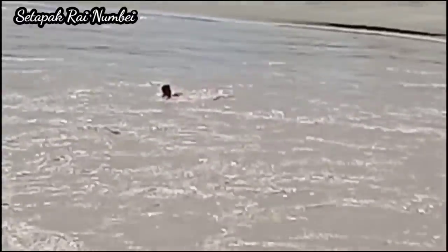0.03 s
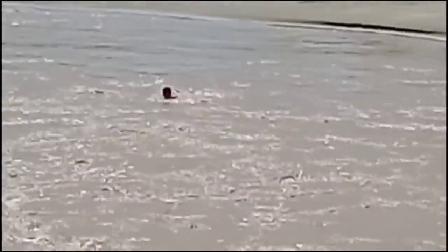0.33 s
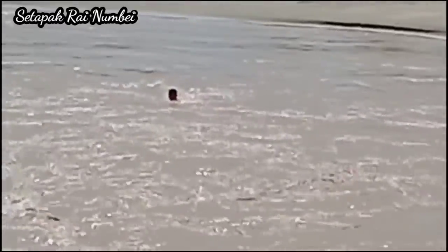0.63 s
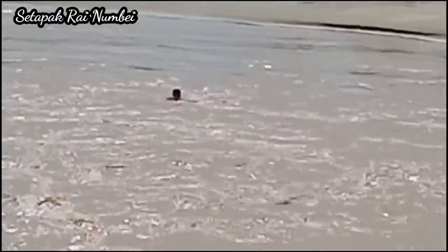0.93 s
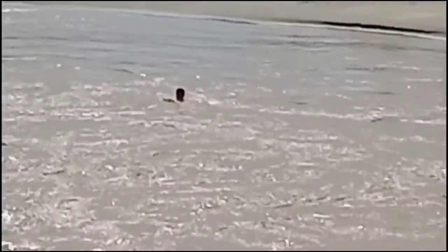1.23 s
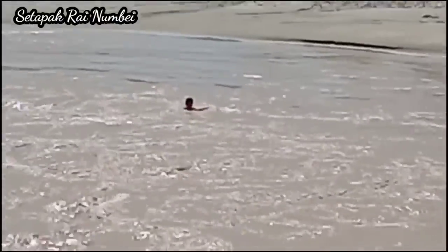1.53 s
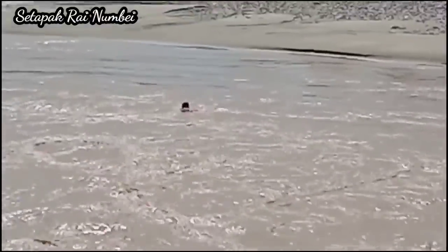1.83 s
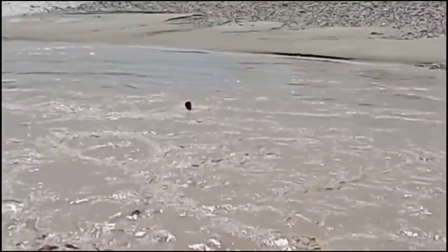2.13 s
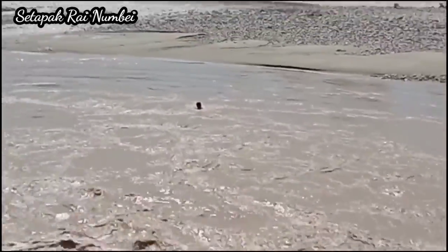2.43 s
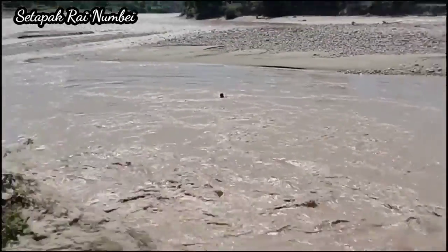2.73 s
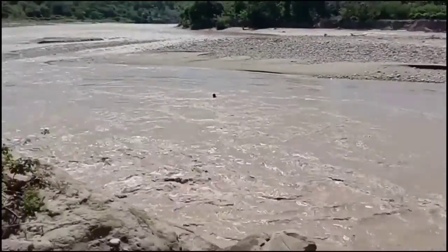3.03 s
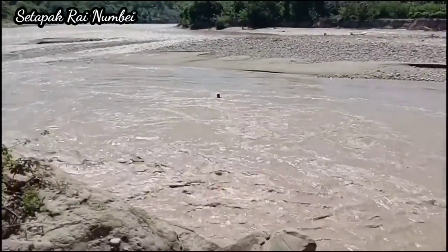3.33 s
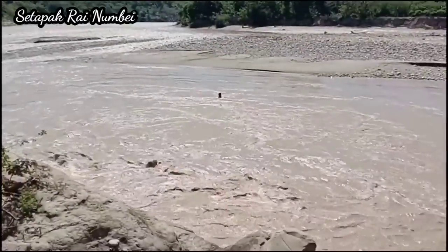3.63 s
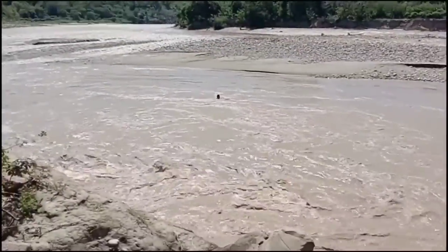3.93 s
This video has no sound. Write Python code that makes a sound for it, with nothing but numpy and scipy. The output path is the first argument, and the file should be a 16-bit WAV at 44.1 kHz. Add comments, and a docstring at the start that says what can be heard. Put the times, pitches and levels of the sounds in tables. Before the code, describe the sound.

Rushing river water bubbles and gurgles while low wind rumbles against the microphone.

```python
"""Stony bank of a flooded river. The current rushes past as a wide wash, full of small
ringing bubbles and ticking spray; swallowed air pockets gulp and wave crests splash.
Toward the end the microphone turns to a nearer, brighter riffle.
Wind gusts rumble on the microphone, and single eddies buffet it."""
import sys
import numpy as np
from scipy import signal
from scipy.fft import rfft, irfft
from scipy.io import wavfile
from scipy.ndimage import uniform_filter1d

SR = 44100
rng = np.random.default_rng(int(sys.argv[2]) if len(sys.argv) > 2 else 0)


def pcm_store(signal):
    """Save signal as 16-bit PCM."""
    levels = np.round(np.clip(np.atleast_2d(signal), -1, 1) * 32767)
    wavfile.write(sys.argv[1], SR, levels.astype(np.int16).T)


N = 176400

# river and splash colour (frequency [Hz], relative level [dB])
WATER_SPECTRUM = [(60, -26), (250, -23), (340, -15), (425, -12), (470, -2), (560, -0.5), (650, -1),
                  (790, -4.5), (1170, 0.5), (1450, -2), (1880, -7), (2080, -14), (2450, -16.5),
                  (3150, -11.5), (4300, -6.5), (4750, -10.5), (5280, -23), (6400, -18), (7750, -15),
                  (8250, -20.5), (9300, -41), (9900, -33), (10900, -31.5), (11500, -35.5), (13200, -27.5),
                  (15400, -25)]
# river swell, each band used about its mean (time [s], body [dB], hiss [dB], fizz [dB])
RIVER_SWELL = [(0, -34, -35, -48), (.35, -34.5, -35, -51.5), (.9, -34.5, -36, -51), (1.3, -35, -36.5, -52),
               (2.05, -34.5, -36, -52), (2.35, -36, -37.5, -54.5), (2.6, -37, -37.5, -54.5),
               (3.15, -35, -36, -56.5), (3.4, -34.5, -35, -54.5), (3.72, -36, -35.5, -56.5),
               (3.88, -33.5, -36, -52), (4, -37.5, -39, -60)]
# crossfades (body-hiss start [Hz], end [Hz], hiss-fizz start [Hz], end [Hz])
CROSSFADES_HZ = [1800, 2830, 10100, 12000]
# microphone turn toward the riffle (time [s], share [0-1])
MIC_TURN = [(0, 0), (2.1, 0.18), (2.9, 0.35), (4, 1)]
# riffle colour (frequency [Hz], relative level [dB])
RIFFLE_SPECTRUM = [(200, -37), (400, -2), (700, -8), (1200, -5), (1900, -8), (2400, 4.5), (3600, 9),
                   (4500, -15), (5050, -6), (5800, 4), (7500, -3), (9200, -12), (10000, -11), (10900, -13),
                   (11600, -30), (15000, -30)]
# riffle nearness (time [s], level [dB])
RIFFLE_ENVELOPE = [(0, -74), (2.6, -55), (3.15, -50), (3.5, -43), (4, -42)]
# collapsing crests (time [s], level [dB])
SPLASH_EVENTS = [(0.512, -33), (1.971, -36), (3.454, -41), (3.526, -31.5), (3.611, -32.5), (3.85, -45)]
# swallowed air pockets (time [s], level [dB], start pitch [Hz])
GULP_EVENTS = [(.875, -27, 1140), (1.135, -34, 627), (1.99, -34, 565), (3.862, -28.5, 581),
               (3.89, -34, 445), (3.945, -30, 1055)]
# wind strength (time [s], level before trim [dB])
GUST_ENVELOPE = [(0, -26.5), (.17, -23), (.26, -40), (.3, -31.5), (.39, -59), (.45, -32), (.51, -37),
                 (.57, -25), (.7, -27.5), (.82, -35.5), (.97, -32), (1.03, -51), (1.14, -47), (1.24, -27.5),
                 (1.36, -35.5), (1.49, -27), (1.54, -35.5), (1.61, -24.5), (1.85, -31.5), (1.99, -29),
                 (2.06, -48), (2.15, -37), (2.23, -62), (2.28, -33), (2.33, -49), (2.38, -27), (2.49, -36),
                 (2.58, -45), (2.72, -29), (2.93, -27), (3.17, -26), (3.36, -28), (3.43, -29.5),
                 (3.58, -29.5), (3.65, -35.5), (3.73, -28.5), (3.92, -35.5), (4, -45)]
# rumble of a light and a strong gust (frequency [Hz], relative level [dB])
LIGHT_GUST_SPECTRUM = [(20, -27), (42, -24), (68, -1.5), (105, -0.5), (150, -4), (200, -12.5), (280, -20),
                       (420, -26), (900, -64), (3000, -90)]
STRONG_GUST_SPECTRUM = [(20, -30), (42, -21), (68, -2), (115, 1.5), (160, 1), (210, -1), (300, -10),
                        (420, -18), (900, -54), (3000, -85)]
# eddies hitting the microphone (time [s], level before trim [dB], pitch [Hz])
BUFFET_EVENTS = [(0.612, -16.5, 130), (0.657, -15, 168.3), (0.722, -21.5, 187.6), (1.583, -17, 166.2),
                 (1.959, -12.5, 150), (2.377, -20.5, 180), (2.481, -15.5, 139.8), (2.828, -14.5, 148.7),
                 (2.908, -12, 209), (2.972, -11, 150.2), (3.06, -12.5, 114.1), (3.121, -16.5, 229.4),
                 (3.152, -11, 150.2), (3.276, -19, 99.7), (3.364, -11.5, 120.6), (3.596, -19.5, 110.4),
                 (3.724, -17.5, 115)]


def river(wash_db=-32, bubbles_db=-39.5, spray_db=-46.5, band_trims_db=(-0.5, -0.5, 1)):
    """Rushing current: wash, bubbles and spray, swelling slowly in three bands."""
    water = amp(wash_db) * water_colour(churn(flicker_db=1.25))
    water += amp(bubbles_db) * water_colour(bubbles())
    water += amp(spray_db) * water_colour(spray(spread_db=3, decay_s=0.00043, highpass_hz=3470))
    hz, bins, out = np.fft.rfftfreq(N, 1 / SR), rfft(water), np.zeros(N)
    band_gains = [(1, 0, 0, 0), (0, 1, 1, 0), (0, 0, 0, 1)]  # body, hiss, fizz
    for k, trim_db in enumerate(band_trims_db):
        band = irfft(bins * np.interp(hz, CROSSFADES_HZ, band_gains[k]), N)
        swell_db = curve(RIVER_SWELL, column=k + 1)
        out += band * amp(swell_db - swell_db.mean() + trim_db)
    return out


def churn(flicker_db, patch_db=1):
    """Churning water: noise in short patches, the treble flickering as one."""
    frames, hz = N // 128 + 5, np.fft.rfftfreq(512, 1 / SR)
    real, imag, patches = rng.standard_normal((3, frames, len(hz)))
    patches = uniform_filter1d(patches, size=18, axis=0)
    patches = unit(uniform_filter1d(patches, size=9, axis=1))
    flicker = unit(uniform_filter1d(rng.standard_normal(frames), size=9))
    treble_flicker = flicker[:, None] * np.sqrt(hz / hz[-1])
    bins = (real + 1j * imag) * amp(patch_db * patches + flicker_db * treble_flicker)
    return signal.istft(bins.T, nperseg=512, noverlap=384)[1][:N]


def bubbles(rate_per_s=500, low_hz=480.5, high_hz=4956, decay_cycles=8.2, glide=0.022, sizes=48):
    """Small bubbles ring briefly and rise in pitch."""
    out = np.zeros(N)
    for hz in np.geomspace(low_hz, high_hz, sizes):
        age = np.arange(0, 4 * decay_cycles / hz, 1 / SR) * hz / decay_cycles  # in decay times
        envelope = np.exp(-age) * (1 - np.exp(-10 * age))
        ring = envelope * np.sin(2 * np.pi * decay_cycles * age * (1 + glide * age))
        births = impulses(rate_per_s / sizes, spread_db=3.5, max_spreads=3)
        out += signal.oaconvolve(births, ring * hz ** 0.84)[:N]
    return out


def spray(spread_db, decay_s, highpass_hz, rate_per_s=260, shapes=12):
    """Droplets fall back on the water as tiny ticks."""
    out, t = np.zeros(N), np.arange(512) / SR
    for _ in range(shapes):
        drops = impulses(rate_per_s / shapes, spread_db, max_spreads=4)
        tick = rng.standard_normal(len(t)) * np.exp(-t / decay_s)
        out += signal.oaconvolve(drops, tick)[:N]
    return signal.sosfilt(highpass(2, highpass_hz), out)


def riffle():
    """Nearer water breaks over stones, brighter and grainier."""
    water = unit(churn(flicker_db=1.5))
    water += 1.2 * unit(spray(spread_db=4.5, decay_s=0.0017, highpass_hz=1500))
    return amp(curve(RIFFLE_ENVELOPE)) * unit(colour(water, RIFFLE_SPECTRUM))


def splashes(rise_s=0.0031, highpass_hz=3000):
    """Small crests collapse in short bursts of hiss."""
    envelope, age = np.zeros(N), np.arange(SR // 10) / SR / rise_s
    for time_s, db in SPLASH_EVENTS:
        add(envelope, time_s, amp(db) * age * np.exp(1 - age))
    hiss = signal.sosfilt(highpass(3, highpass_hz), rng.standard_normal(N))
    return envelope * water_colour(hiss)


def gulps(rise_s=0.009, glide_per_s=1.2, wobble=0.078, wobble_hz=120):
    """Swallowed air pockets ring with an unsteady, rising pitch."""
    out, t = np.zeros(N), np.arange(SR // 10) / SR
    envelope = t / rise_s * np.exp(1 - t / rise_s)
    unsteady = 1 + wobble * drift(wobble_hz)
    for time_s, db, hz in GULP_EVENTS:
        pitch_hz = hz * (1 + glide_per_s * t) * np.roll(unsteady, -round(time_s * SR))[:len(t)]
        add(out, time_s, amp(db) * envelope * np.sin(2 * np.pi * np.cumsum(pitch_hz) / SR))
    return out


def wind(light_db=-31.5, strong_db=-22, trim_db=0.5, lump_depth=3, lump_hz=30):
    """Turbulence on the microphone: lumpy rumble, reaching higher as the gust grows."""
    gust_db, air = curve(GUST_ENVELOPE), rng.standard_normal(N)
    force = np.clip((gust_db - light_db) / (strong_db - light_db), 0, 1)
    rumble = (1 - force) * unit(colour(air, LIGHT_GUST_SPECTRUM))
    rumble += force * unit(colour(air, STRONG_GUST_SPECTRUM))
    rumble *= amp(lump_depth * drift(lump_hz))
    rumble /= np.sqrt(uniform_filter1d(rumble ** 2, size=3000) + 1e-9)  # only fast lumps remain
    return amp(gust_db + trim_db) * rumble


def buffets(trim_db=-2, sigma_s=0.0079, wobble=0.19, wobble_hz=180, roughness=0.41, highpass_hz=60):
    """Each eddy shakes the microphone for a few uneven cycles."""
    out, t = np.zeros(N), np.arange(N) / SR
    warped_s = np.cumsum(1 + wobble * drift(wobble_hz)) / SR
    for time_s, db, hz in BUFFET_EVENTS:
        envelope = amp(db + trim_db) * np.exp(-0.5 * ((t - time_s) / sigma_s) ** 2)
        out += envelope * np.sin(2 * np.pi * (hz * warped_s + rng.random()))
    out *= 1 + roughness * drift(wobble_hz)
    return signal.sosfiltfilt(highpass(2, highpass_hz), out)


def water_colour(x, turned_ratio=0.97):
    """Water spectrum, sinking slightly as the microphone turns; rms 1."""
    turn = curve(MIC_TURN)
    turned_spectrum = [(hz * turned_ratio, db) for hz, db in WATER_SPECTRUM]
    return unit((1 - turn) * colour(x, WATER_SPECTRUM) + turn * colour(x, turned_spectrum))


def colour(x, table):
    """Filter by a spectrum table, on a log-frequency axis."""
    table_hz, table_db = np.transpose(table)
    hz = np.fft.rfftfreq(N, 1 / SR)
    gain_db = np.interp(np.log(hz + 1), np.log(table_hz + 1), table_db)
    return irfft(rfft(x) * amp(gain_db), N)


def impulses(rate_per_s, spread_db, max_spreads):
    """Random impulses, a few much stronger than the rest."""
    hits = rng.random(N) < rate_per_s / SR
    return hits * amp(spread_db * np.minimum(rng.exponential(1, N), max_spreads))


def drift(rate_hz):
    """Smooth random wander; rms 1."""
    hz = np.fft.rfftfreq(N, 1 / SR)
    slow_band = np.exp(-(hz / rate_hz) ** 2) * (hz > 1)
    return unit(irfft(rfft(rng.standard_normal(N)) * slow_band, N))


def curve(table, column=1):
    """Time table column at every sample."""
    rows = np.array(table)
    return np.interp(np.arange(N) / SR, rows[:, 0], rows[:, column])


def highpass(order, hz):
    """Butterworth sections."""
    return signal.butter(order, hz, "high", fs=SR, output="sos")


def add(mix, time_s, sound):
    """Mix in at time_s."""
    part = mix[max(round(time_s * SR), 0):][:len(sound)]
    part += sound[:len(part)]


def amp(db):
    """dB to gain."""
    return 10 ** (np.asarray(db) / 20)


def unit(x):
    """Scale to rms 1."""
    return x / np.sqrt(np.mean(x ** 2) + 1e-20)


def scene():
    """Water and wind at one microphone."""
    return (river() + riffle() + splashes() + wind() + buffets() + gulps())[None]


def record(dry):
    """Recorder band limit."""
    cutoff_hz = 15560
    lowpass = signal.firwin(511, cutoff_hz, window=("kaiser", 9), fs=SR)
    return signal.oaconvolve(dry, lowpass[None], "same")


dry = scene()
out = record(dry)
pcm_store(out)
```